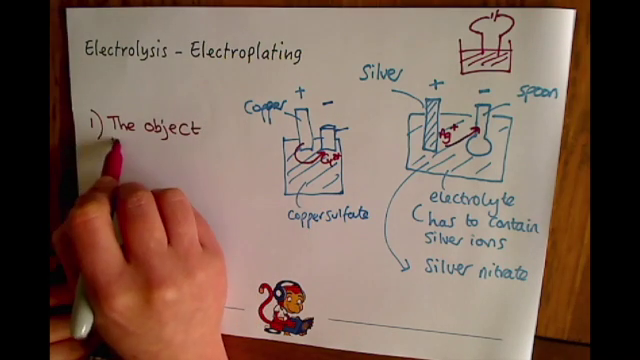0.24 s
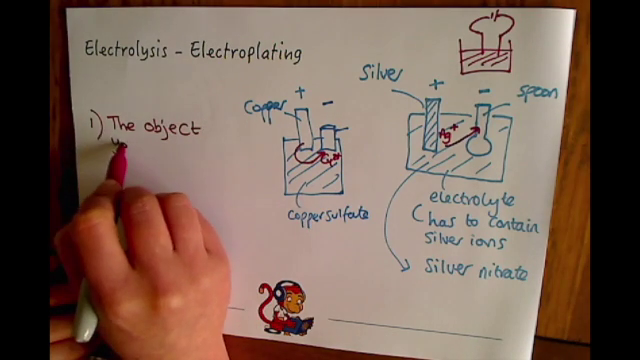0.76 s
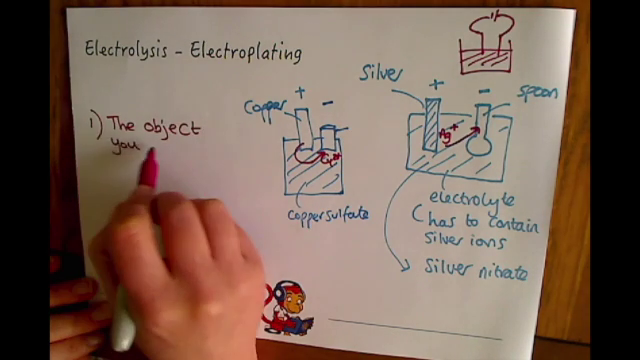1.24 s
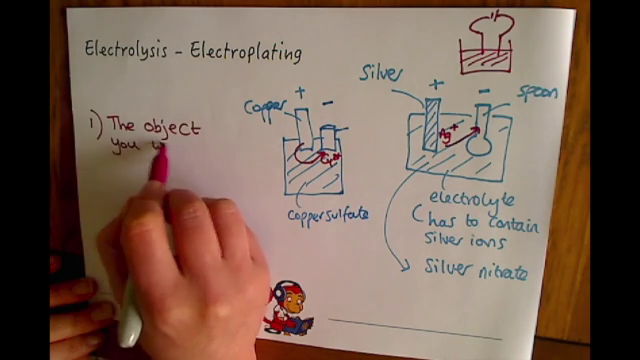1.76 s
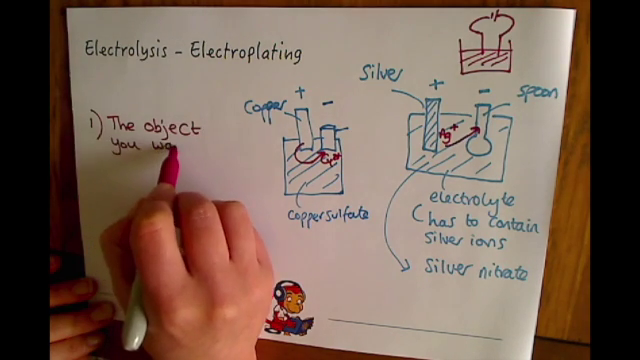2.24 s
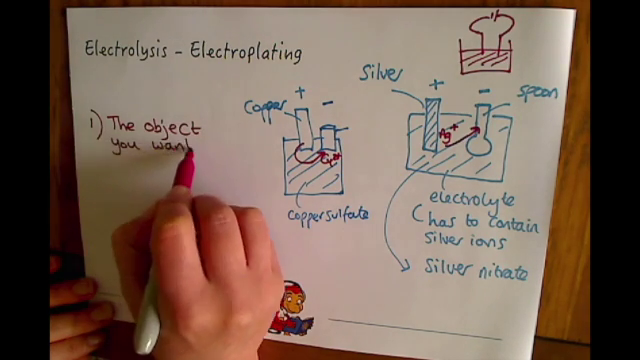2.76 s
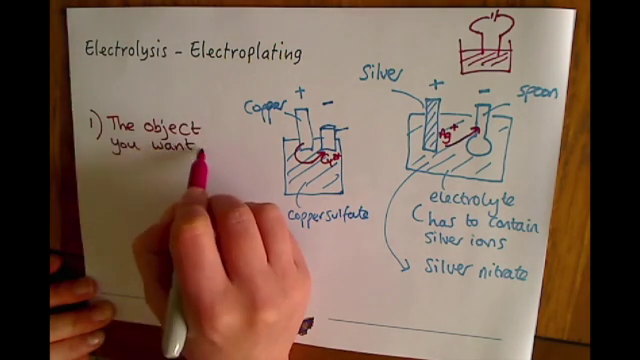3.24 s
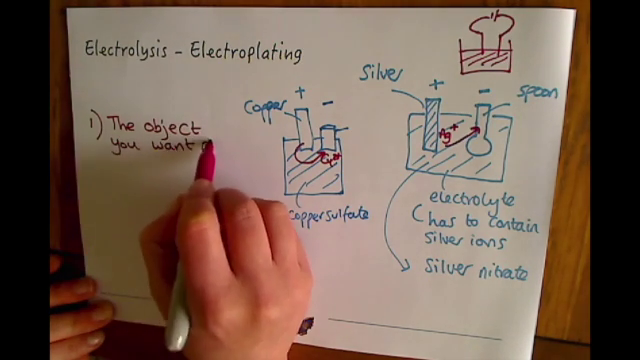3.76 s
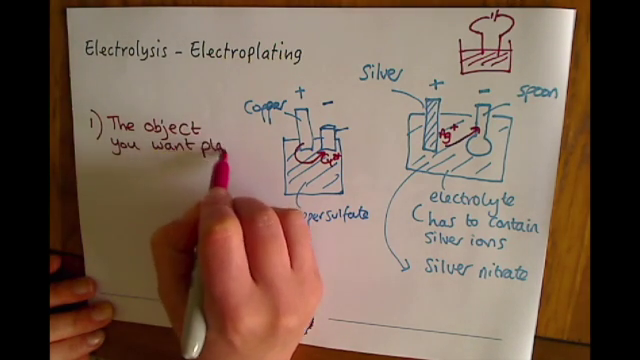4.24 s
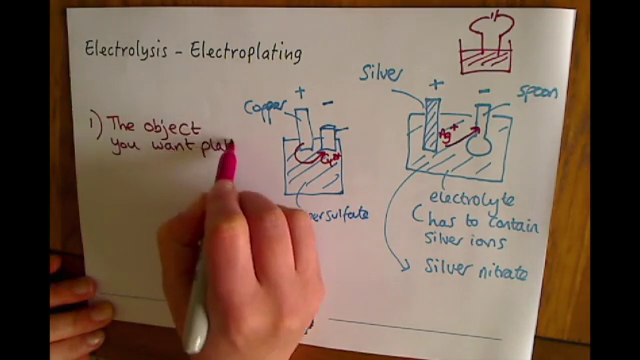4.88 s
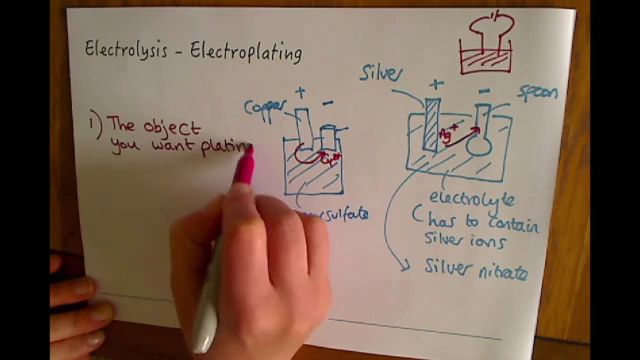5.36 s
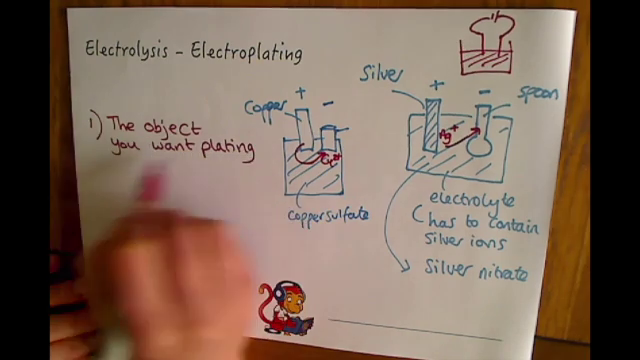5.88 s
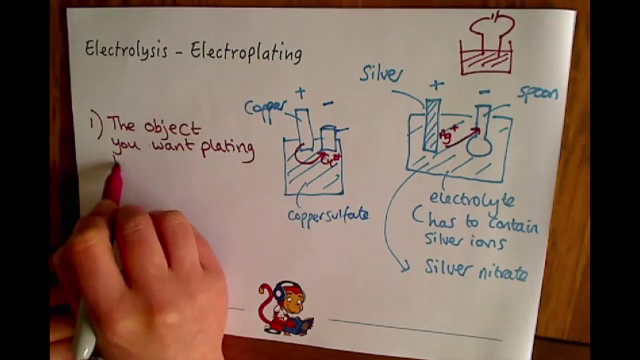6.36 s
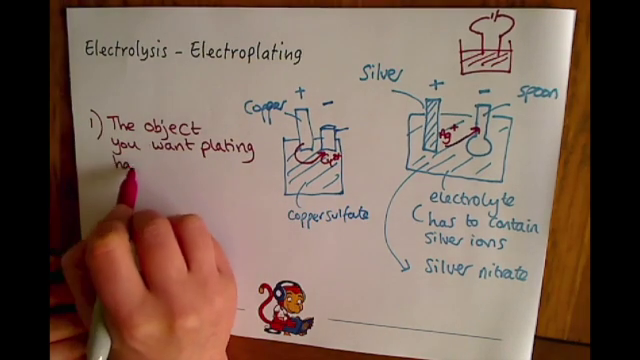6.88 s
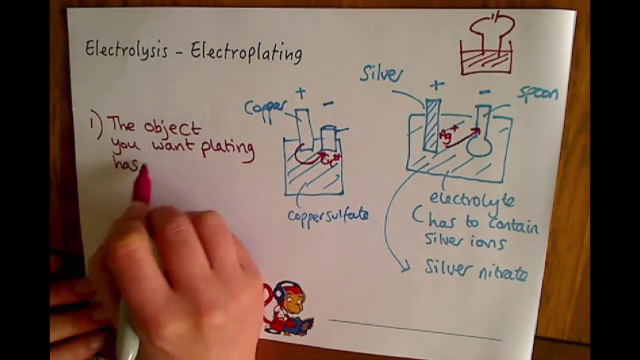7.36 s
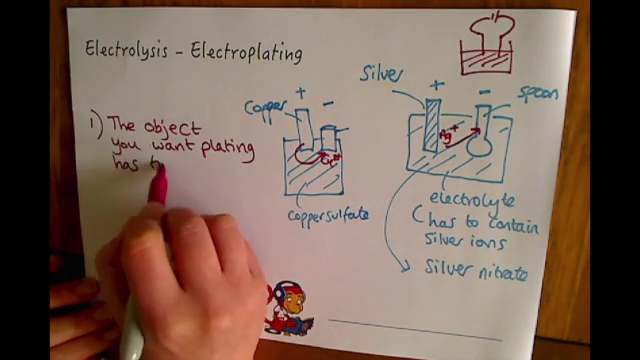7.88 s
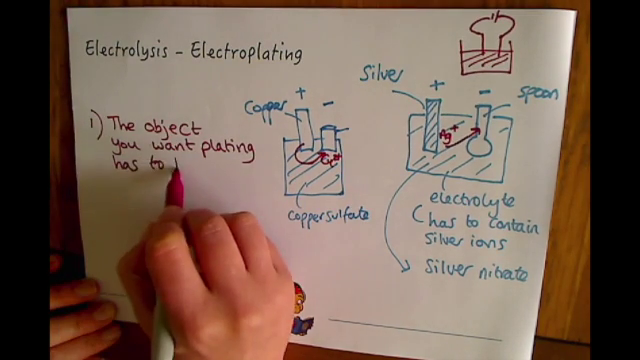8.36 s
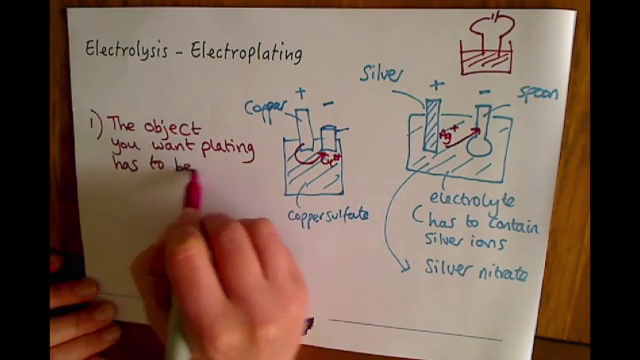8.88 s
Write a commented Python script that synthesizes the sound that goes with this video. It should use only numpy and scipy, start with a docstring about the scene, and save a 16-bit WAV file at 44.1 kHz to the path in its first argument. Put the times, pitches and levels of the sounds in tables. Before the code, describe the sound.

Close microphone, muted treble: steady soft room rumble and hiss with a barely audible thin whine. A marker scratches paper in brisk, uneven little strokes, each swelling and fading, with a papery hiss, mid-pitched barrel rasp and faint desk murmur. Dull woody taps land among them, strongest around three and five seconds. Airy skin swishes separate words. Near the end, a quick plastic double click precedes a short felt squeak, and writing continues.

```python
"""A felt marker writes a few words on paper lying on a wooden desk, over steady room noise and a faint whine.
From the first stroke on, fibre snags hiss, set the pen barrel rasping and murmur in the desk; the tip ticks.
Soon firm landings add a tick and a soft, low knock; the hand slides along between words with an airy swish.
Past the middle the felt squeaks briefly; later it squeaks again, shortly after two hard clicks of the plastic pen."""
import sys
import numpy as np
from scipy import signal
from scipy.fft import rfft, irfft
from scipy.io import wavfile

SR = 44100
rng = np.random.default_rng(int(sys.argv[2]) if len(sys.argv) > 2 else 0)


def store_pcm(level_fs):
    """Save levels as 16-bit WAV."""
    pcm = np.round(np.clip(level_fs, -1, 1) * 32767).astype(np.int16)
    wavfile.write(sys.argv[1], SR, np.atleast_2d(pcm).T)


N = 402191
TIME_S = np.arange(N) / SR
TREBLE_LIMIT_HZ = 7440

# Room noise spectrum: (frequency [Hz], relative level [dB])
ROOM_SPECTRUM = [(15, 2.5), (30, 0.5), (42, -2.5), (55, 0.5), (85, -8), (135, -4.5), (200, -7), (300, -9),
                 (500, -16.5), (1000, -18.5), (2000, -22.5), (4000, -25), (7300, -28.5)]
# Faint electrical whine: (frequency [Hz], nominal width [Hz], level [dB])
WHINE_LINES = [(3345, 22, -85.5), (5020, 20, -83), (6695, 24, -86)]
# Hand slides between words: (start [s], length [s], level [dB])
HAND_SLIDES = [(1.091, 0.18, -60.5), (2.947, 0.2, -61), (5.754, .3, -61), (7.156, 0.17, -61),
               (8.001, 0.15, -60.5), (8.9, 0.14, -65.5)]
# Skin on paper, spectrum: (frequency [Hz], relative level [dB])
SKIN_SPECTRUM = [(150, -22), (400, 3), (700, -7.5), (1400, -2.5), (2100, -3), (3000, -1.5), (4200, 4),
                 (5400, 1.5), (6600, 0), (7300, -12.5)]
# Felt squeaks: (start [s], end [s], start frequency [Hz], end frequency [Hz], level [dB])
FELT_SQUEAKS = [(5.152, 5.183, 3660, 2900, -61), (7.607, 7.67, 2020, 2036, -59)]
# Hard clicks of the plastic pen: (time [s], level [dB])
PEN_CLICKS = [(7.406, -42.5), (7.4894, -37.5)]
# Modes of the plastic: (frequency [Hz], relative level [dB], t60 [s])
PLASTIC_MODES = [(1690, -7.5, 0.0055), (2710, -6, 0.0056), (3580, -4, 0.0049), (4300, -4.5, 0.0033),
                 (5600, -9, .003)]
# Tip ticks as it lands at the start of a stroke, or flicks the paper: (time [s], nominal peak [dB])
TIP_TICKS = [(0.513, -51.5), (1.354, -49.5), (2.373, -55), (2.8998, -48), (3.6461, -51), (4.583, -53),
             (4.9985, -56), (5.371, -44), (6.1903, -49.5), (6.3664, -56), (6.5844, -50), (6.629, -52),
             (6.9915, -54), (7.6201, -51), (7.6874, -53), (8.4044, -48), (8.5674, -51.5), (8.6804, -56)]
# Tip burst spectrum: (frequency [Hz], relative level [dB])
TIP_SPECTRUM = [(500, -20.5), (1200, -15.5), (1700, -5), (2300, -10), (3100, 1.5), (3800, 5), (4350, -2.5),
                (5050, 3), (5600, -2.5), (7300, -12)]
# Firm landings that knock on the desk: (time [s], nominal level [dB])
DESK_KNOCKS = [(0.852, -47.5), (2.259, -44.5), (2.64, -39), (2.87, -33.5), (3.404, -49), (3.761, -54.5),
               (3.969, -45.5), (4.38, -41.5), (4.586, -49.5), (4.832, -36.5), (5.002, -55.5), (5.388, -51),
               (7.479, -53.5), (7.69, -53.5), (8.653, -44)]
# Modes of the desk top: (frequency [Hz], relative level [dB], t60 [s])
DESK_MODES = [(131, -41, 0.11), (185.2, -18, 0.37), (236.3, -7.5, 0.11), (272.4, -14.5, 0.12),
              (317, -4, 0.074), (386, -18.5, 0.15), (434, -6.5, 0.047), (514, -11, 0.052),
              (614.6, -17, 0.2), (810, -18, 0.027)]
# Pen strokes, one per line, curve or dot: (start [s], length [s], speed [dB], pressure [dB]); 0 dB = ordinary
PEN_STROKES = [(0.095, 0.093, -5, -2), (0.161, 0.11, 1, 0.9), (0.262, 0.159, -2, -1.4),
               (0.366, 0.092, 4.5, -1.5), (0.537, 0.27, -2, -0.5), (0.668, 0.087, 0, 3.5),
               (0.882, 0.18, -2, 1.5), (0.964, 0.085, 1.5, -1), (1.047, 0.093, -1, -1.5),
               (1.42, 0.093, -4.7, -4), (1.49, 0.086, -1.2, -0.3), (1.592, 0.15, -6.5, -6),
               (1.659, 0.091, -0.1, 6.5), (1.852, 0.16, -1.2, -0.4), (1.974, 0.11, 0.5, -1),
               (2.087, 0.12, -6, -1), (2.362, 0.093, 0.8, 2), (2.424, 0.12, -7, 3.5), (2.674, 0.14, -2, 2),
               (2.891, 0.08, 4.5, -2.5), (3.281, 0.084, -5, -8), (3.398, 0.15, 4.8, 4.5),
               (3.467, 0.114, 0.2, 2.5), (3.554, 0.11, 3.5, 1), (3.779, 0.132, -3, 0.2),
               (3.963, 0.14, -1.5, 3.5), (4.092, 0.083, 2, 1), (4.178, 0.12, -3.4, 0),
               (4.394, 0.12, -3.5, 1), (4.576, 0.16, -3, -2), (4.833, 0.025, -5, 14),
               (4.998, 0.13, -10.5, -1.4), (5.117, 0.093, 2.5, -12), (5.171, 0.17, -5.5, -0.3),
               (5.374, 0.05, 0, 3.5), (5.406, 0.103, -1.5, 3), (5.496, 0.093, -0.5, -1),
               (5.588, 0.19, 1, -5.5), (5.659, 0.1, 4.5, -7.5), (6.236, 0.11, -2.7, -1.8),
               (6.355, 0.078, 2.9, -1), (6.406, 0.14, -8, -1.5), (6.576, 0.16, -2.0, 3.5),
               (6.697, 0.086, 4, 0), (6.792, 0.122, -6, 0), (6.982, 0.075, -0.3, -9), (7.036, 0.1, -3, 1),
               (7.117, 0.063, 5.5, -2), (7.473, 0.17, -2, 0), (7.686, 0.11, 2.5, 0.8),
               (7.769, 0.091, -4, -1.5), (7.849, 0.11, 4, 2.2), (7.925, 0.092, 2.7, -1),
               (8.271, 0.11, -2.5, 1.3), (8.395, 0.083, -0.7, 1), (8.475, 0.11, 3, 0),
               (8.674, 0.1, 5.5, 2.3), (8.746, 0.18, -2.7, -2.5), (8.866, 0.08, 4.1, -3)]
# Fibre hiss spectrum: (frequency [Hz], relative level [dB])
FIBRE_SPECTRUM = [(900, -16.5), (2000, -5), (2600, 1), (3200, -2.5), (4000, -1), (4700, 2), (5600, -0.5),
                  (6400, 2), (6800, -7.5), (7300, -7.5)]
# Desk murmur spectrum: (frequency [Hz], relative level [dB])
MURMUR_SPECTRUM = [(100, -19), (180, -1), (300, -1), (430, 1), (550, 1.5), (720, -9), (1000, -18),
                   (1800, -38.5)]
# Pen barrel resonances: (frequency [Hz], width [Hz], relative level [dB])
BARREL_MODES = [(963, 110, -5.5), (1307, 120, -4.5), (1458, 80, -1), (1634, 74, 1.5), (1815, 100, -0.5),
                (2050, 167, -2.5), (2390, 57, -7), (2773, 180, -10.5)]
# Upper resonances of the tip: (frequency [Hz], width [Hz], relative level [dB])
NIB_MODES = [(2830, 1000, -8), (3810, 210, 1.5), (5090, 210, -3), (6230, 530, -2.5), (7170, 600, -4)]
# Part of the hiss power sent through the tip resonances by the pen angle: (time [s], share [0-1])
NIB_SHARE = [(0, 0.14), (2.5, .1), (2.9, .55), (3.5, .55), (4.5, 0.17), (6.4, 0.12), (7.2, 0.43),
             (8.1, 0.3), (8.45, .65)]
# Hiss brightness as the felt turns between flat and edge: (time [s], treble over bass [dB])
EDGE_BRIGHTNESS = [(0, -1), (2.2, -1), (4.2, 2.5), (5.7, 4), (7.6, -0.5), (9, -4)]

ROOM_NOISE_DB = -64
# Point of greatest speed, as a share of the length
STROKE_FASTEST, SLIDE_FASTEST = 0.35, 0.55
# Ordinary stroke at its fastest
HISS_DB, RASP_DB, MURMUR_DB = -61.5, -62.5, -67.5
# Slopes [dB per dB]; hiss follows speed 1:1, murmur follows pressure 1:1
RASP_PER_SPEED, RASP_PER_PRESSURE, MURMUR_PER_SPEED = 0.45, 0.46, 0.38
# Tick at the start of each knock, level relative to the knock; the felt yields before it pushes on the desk
KNOCK_TICK_DB, KNOCK_TICK_T60_S, FELT_GIVES_S = -18.5, 0.019, 0.0025
TIP_TICK_T60_S = 0.052


def from_db(db):
    """Convert decibels to an amplitude factor."""
    return 10 ** (np.asarray(db) / 20)


def rms_one(x):
    """Scale to rms 1."""
    return x / np.sqrt(np.mean(x ** 2) + 1e-20)


def coloured(x, spectrum):
    """Shape a steady signal with a spectrum, interpolated over log frequency; rms 1."""
    table_hz, table_db = np.transpose(spectrum)
    bin_hz = np.maximum(np.fft.rfftfreq(N, 1 / SR), 1)
    gain = from_db(np.interp(np.log(bin_hz), np.log(table_hz), table_db))
    gain *= bin_hz < TREBLE_LIMIT_HZ * 1.05
    return rms_one(irfft(rfft(x) * gain, N))


def drift(rate_hz):
    """Random fluctuation: noise through a two-pole low-pass, rms 1."""
    pole = np.exp(-2 * np.pi * rate_hz / SR)
    noise = rng.standard_normal(N + SR)
    settled = signal.lfilter([1], [1, -2 * pole, pole * pole], noise)[SR:]
    return rms_one(settled)


def resonance(x, hz, width_hz):
    """Two-pole band-pass, peak gain 1."""
    r = np.exp(-np.pi * width_hz / SR)
    numerator = np.array([1, 0, -1]) * (1 - r * r) / 2
    return signal.lfilter(numerator, [1, -2 * r * np.cos(2 * np.pi * hz / SR), r * r], x)


def ring(impulses, hz, t60_s):
    """Mode: a unit impulse starts a decaying sine of height 1."""
    r = np.exp(-np.log(1000) / (t60_s * SR))
    w = 2 * np.pi * hz / SR
    return signal.lfilter([0, np.sin(w)], [1, -2 * r * np.cos(w), r * r], impulses + 1e-18)


def gestures(rows, levels_db, power, fastest):
    """Movements speed up and slow down; amplitude follows a power of speed, overlaps add in power."""
    total_power = np.zeros(N)
    for (start_s, length_s, *_), db in zip(rows, levels_db):
        span = slice(int(start_s * SR), int((start_s + length_s) * SR))
        progress = np.interp((TIME_S[span] - start_s) / length_s, [0, fastest, 1], [0, 0.5, 1])
        speed = np.abs(np.sin(np.pi * progress))
        total_power[span] += (from_db(db) * speed ** power) ** 2
    return np.sqrt(total_power)


def snags(per_s, spread_db):
    """Fibres catch and let go at random: tiny clicks of uneven size and either sign, rms 1."""
    sizes = from_db(spread_db * np.minimum(rng.exponential(1, N), 4))
    signed = sizes * rng.choice([-1, 1], N)
    return rms_one(signed * (rng.random(N) < per_s / SR))


def background():
    """Steady room rumble and hiss, plus three thin whine lines of narrow-band noise."""
    white = rng.standard_normal(N)
    whine = 0
    for hz, width_hz, db in WHINE_LINES:
        once = resonance(white, hz, 2 * width_hz)
        whine = whine + from_db(db) * rms_one(resonance(once, hz, 2 * width_hz))
    return from_db(ROOM_NOISE_DB) * coloured(rng.standard_normal(N), ROOM_SPECTRUM) + whine


def hand():
    """Skin brushes the sheet: smooth coloured noise that swells and fades with hand speed."""
    swish = coloured(rng.standard_normal(N), SKIN_SPECTRUM)
    levels_db = np.array(HAND_SLIDES)[:, 2]
    return swish * gestures(HAND_SLIDES, levels_db, power=1.0, fastest=SLIDE_FASTEST)


def squeaks(waver=0.012, rough_db=3.5):
    """Stick and slip turns regular for a moment: a sine with unsteady pitch and level."""
    out = 0
    wobble = 1 + waver * drift(140)
    roughness = from_db(rough_db * drift(80))
    for start_s, end_s, start_hz, end_hz, db in FELT_SQUEAKS:
        hz = np.interp(TIME_S, [start_s, end_s], [start_hz, end_hz]) * wobble
        swell = gestures([(start_s, end_s - start_s)], [db], power=0.88, fastest=0.25)
        out = out + swell * roughness * np.sin(2 * np.pi * np.cumsum(hz) / SR)
    return out


def clicks():
    """A hard snap rings the plastic modes for a few milliseconds."""
    snaps = np.zeros(N)
    for time_s, db in PEN_CLICKS:
        snaps[int(time_s * SR)] = from_db(db)
    out = 0
    for k, (hz, db, t60_s) in enumerate(PLASTIC_MODES):
        out = out + (-1) ** k * from_db(db) * ring(snaps, hz, t60_s)
    return out


def ticks(crest_db=7.0):
    """Tip ticks and knock onsets crush a few fibres: noise bursts with fast exponential decay."""
    # crest_db takes the tip ticks from peak to rms level
    bursts = [(time_s, db - crest_db, TIP_TICK_T60_S) for time_s, db in TIP_TICKS]
    bursts += [(time_s, db + KNOCK_TICK_DB, KNOCK_TICK_T60_S) for time_s, db in DESK_KNOCKS]
    level = np.zeros(N)
    age_s = TIME_S[:SR // 10]
    for time_s, db, t60_s in bursts:
        at = int(time_s * SR)
        level[at:at + len(age_s)] += from_db(db) * np.exp(-np.log(1000) * age_s / t60_s)
    return level * coloured(rng.standard_normal(N), TIP_SPECTRUM)


def knocks(low_hz=160, contact_hz=545, level_db=-1.2, echoes=((0.0075, 0.5), (0.0284, 0.42))):
    """The soft tip's band-limited push rings the desk modes; two echoes (delay [s], gain) follow."""
    blows = np.zeros(N)
    for time_s, db in DESK_KNOCKS:
        for delay_s, gain in ((0, 1), *echoes):
            blows[int((time_s + FELT_GIVES_S + delay_s) * SR)] += gain * from_db(db + level_db)
    contact = signal.butter(2, [low_hz, contact_hz], "band", fs=SR, output="sos")
    push = signal.sosfilt(contact, blows + 1e-18)
    out = 0
    for hz, db, t60_s in DESK_MODES:
        varied_push = push * from_db(db + drift(4.5) / 2)
        out = out + ring(varied_push, hz, t60_s)
    return out


def pen_resonances(friction, modes, grip_db):
    """Friction excites pen resonances; the changing grip favours now one, now another; rms 1."""
    out = 0
    for k, (hz, width_hz, db) in enumerate(modes):
        gain = from_db(db + grip_db * drift(8.2))
        out = out + (-1) ** k * gain * resonance(friction, hz, width_hz)
    return rms_one(out)


def writing(judder_db=1.37, grip_db=2.5, press_db=1.0):
    """Fibre snags hiss off the paper; a second snag stream shakes tip, barrel and desk."""
    start_s, _, speed_db, pressure_db = np.transpose(PEN_STROKES)
    hiss_db = HISS_DB + speed_db
    rasp_db = RASP_DB + RASP_PER_SPEED * speed_db + RASP_PER_PRESSURE * pressure_db
    murmur_db = MURMUR_DB + MURMUR_PER_SPEED * speed_db + pressure_db
    bright_db = np.interp(start_s, *np.transpose(EDGE_BRIGHTNESS))

    unevenness_db = judder_db * drift(99) + press_db * drift(16)
    friction = snags(per_s=9000, spread_db=2.5) * from_db(unevenness_db)
    rasp = pen_resonances(friction, BARREL_MODES, grip_db)
    nib = pen_resonances(friction, NIB_MODES, grip_db)
    murmur = coloured(friction, MURMUR_SPECTRUM)

    paper_snags = snags(per_s=14000, spread_db=3.0) * from_db(judder_db * drift(67))
    paper = coloured(paper_snags, FIBRE_SPECTRUM)
    share = np.interp(TIME_S, *np.transpose(NIB_SHARE))
    hiss = np.sqrt(1 - share) * paper + np.sqrt(share) * nib
    # the felt's edge sounds brighter than its flat
    treble = signal.butter(3, 4500, "high", fs=SR, output="sos")
    upper = signal.sosfiltfilt(treble, hiss)
    lower = hiss - upper

    def stroked(x, levels_db, power):
        """Let a sound follow the pen speed of every stroke."""
        return x * gestures(PEN_STROKES, levels_db, power, STROKE_FASTEST)

    return (stroked(upper, hiss_db + bright_db / 2, power=1.0)
            + stroked(lower, hiss_db - bright_db / 2, power=0.96)
            + stroked(rasp, rasp_db, power=0.6)
            + stroked(murmur, murmur_db, power=0.4))


def reflections(x, level_db=-10, count=40):
    """Desk and near walls send back a short scatter of fading echoes; total energy is kept at 1."""
    delays_s = rng.uniform(0.001, 0.04, count)
    fading = np.exp(-np.log(1000) * delays_s / 0.11)  # t60 0.11 s
    response = np.zeros(SR // 10)
    response[(delays_s * SR).astype(int)] = rng.choice([-1, 1], count) * fading
    response *= from_db(level_db) / np.linalg.norm(response)
    response[0] = 1  # direct sound
    return signal.fftconvolve(x, response / np.linalg.norm(response))[:N]


def scene():
    """Pen and hand with reflections, desk knocks and the quiet room."""
    on_paper = writing() + hand() + ticks() + clicks() + squeaks()
    return (reflections(on_paper) + knocks() + background())[None]


def record(dry):
    """The microphone input cuts the treble steeply and adds a small constant offset."""
    offset = -0.0129
    taps = signal.firwin(241, TREBLE_LIMIT_HZ - 150, window=("kaiser", 8), fs=SR)
    return signal.fftconvolve(dry, taps[None], mode="same") + offset


dry = scene()
out = record(dry)
store_pcm(out)
```